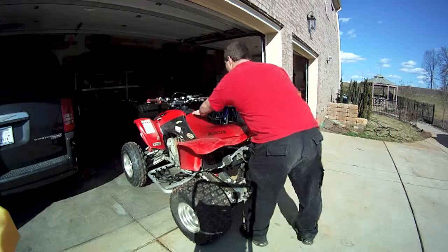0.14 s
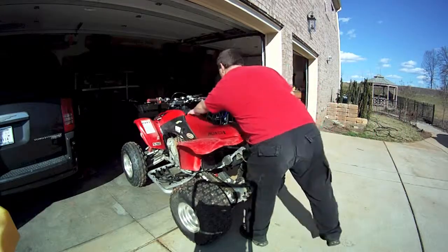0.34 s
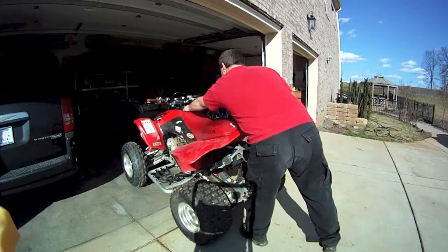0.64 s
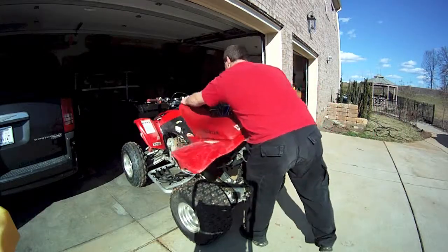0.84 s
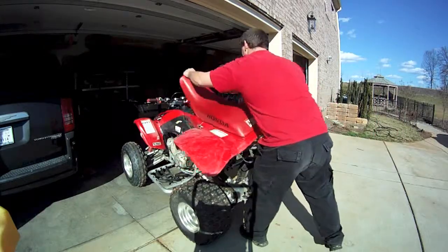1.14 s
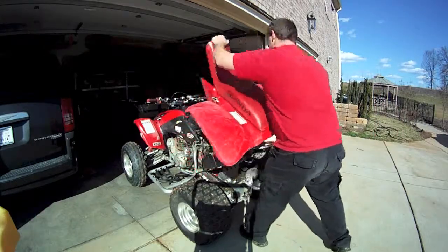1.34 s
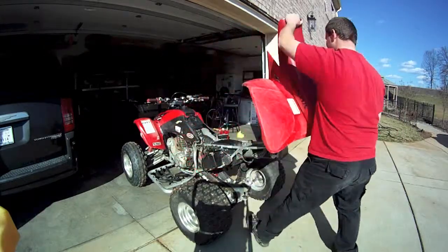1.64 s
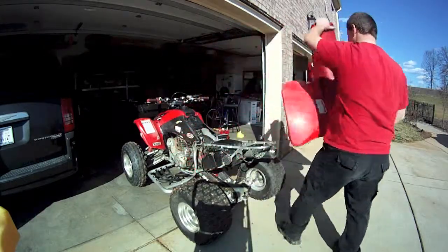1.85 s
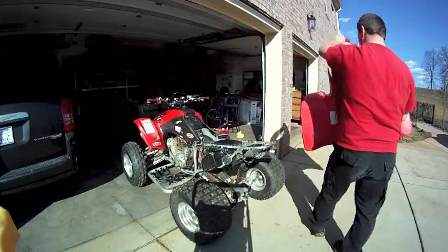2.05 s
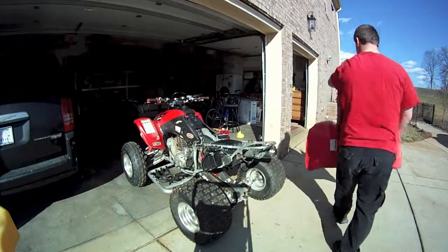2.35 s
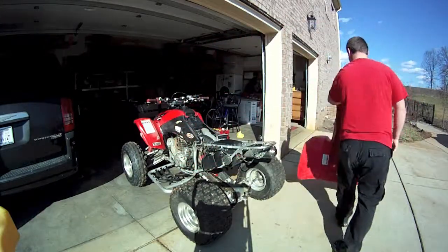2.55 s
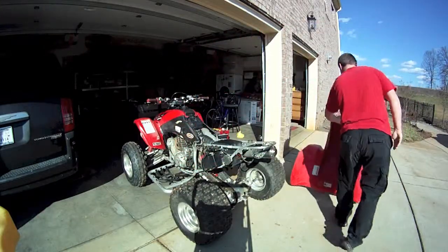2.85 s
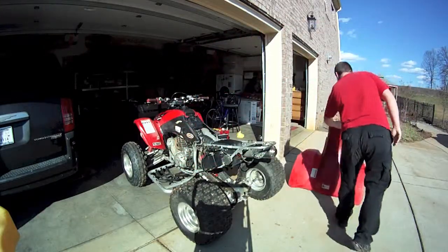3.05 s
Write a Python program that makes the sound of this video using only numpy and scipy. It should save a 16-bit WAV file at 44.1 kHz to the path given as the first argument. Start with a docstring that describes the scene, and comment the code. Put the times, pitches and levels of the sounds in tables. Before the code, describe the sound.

A plastic fender taps lightly at the start, then knocks and scrapes against a quad bike's frame from about 0.5 to 1 second. Faint shoe scuffs and gritty ticks follow from 1.6 to 2.9 seconds. At 3 seconds the fender lands on concrete with a loud, hollow clunk and a small rebound, briefly overloading the microphone. An open garage adds slight echo over steady low rumble, hum and hiss.

```python
"""A plastic fender is tugged off a quad bike, carried a few steps and dropped on a concrete drive.
It knocks and stick-slips on the frame as it comes free; soles scuff grit; the shell lands edge by edge,
its modes ringing in a hollow clunk. An open garage answers, over steady rumble, hum and hiss.
A small camera's coarsely sampled microphone channel overloads on the landing."""
import sys
import numpy as np
from scipy import signal
from scipy.fft import rfft, irfft, next_fast_len
from scipy.io import wavfile
from scipy.ndimage import map_coordinates

SR = 44100
rng = np.random.default_rng(int(sys.argv[2]) if len(sys.argv) > 2 else 0)


def wav_record(signal):
    """Record a signal, one row per channel, as 16-bit PCM in the file named by sys.argv[1]."""
    frames = np.transpose(np.atleast_2d(signal))
    bounded = np.clip(frames, -1, 1)
    # unit amplitude maps onto the largest positive 16-bit level
    quanta = np.round(bounded * 32767).astype(np.int16)
    wavfile.write(sys.argv[1], SR, quanta)


N = 141120
T = np.arange(N) / SR

# fender resonances while held against the frame: centre_hz, width_hz, gain_db
HELD_MODES = [(190.6, 21, 3.5), (298, 47, 1.5), (394, 67, 0.5), (475, 52, -4.5), (742, 17.4, 2),
              (995, 32, -4.5), (1363, 68, -6.5), (1812, 44, -5), (2110, 280, -13), (3250, 370, -9),
              (4200, 120, -17), (4500, 430, -19)]


def amp(db):
    """Decibels to gain."""
    return 10 ** (np.asarray(db) / 20)


def unit(x):
    """Scale to rms 1."""
    return x / np.sqrt(np.mean(x ** 2) + 1e-20)


def along(points, hz):
    """Interpolate (freq_hz, value) points on a log axis."""
    knots_hz, values = np.transpose(points)
    return np.interp(np.log(hz + 1), np.log(knots_hz + 1), values)


def filtered(x, response):
    """Apply response(hz) by FFT."""
    size = next_fast_len(len(x) + 8192)
    return irfft(rfft(x, size) * response(np.fft.rfftfreq(size, 1 / SR)), size)[:len(x)]


def coloured(x, spectrum):
    """Shape x by (freq_hz, gain_db) points; rms 1."""
    return unit(filtered(x, lambda hz: amp(along(spectrum, hz))))


def noise(spectrum):
    """Steady coloured noise; rms 1."""
    return coloured(rng.standard_normal(N), spectrum)


def narrow_noise(centre_hz, width_hz):
    """Noise band around a steady or moving centre; rms 1."""
    phase = 2 * np.pi * np.cumsum(centre_hz + np.zeros(N)) / SR
    i, q = [filtered(rng.standard_normal(N), lambda hz: 1 / (1 + (hz / width_hz) ** 2)) for _ in range(2)]
    return unit(i * np.cos(phase) + q * np.sin(phase))


def band_decay(x, t60_points):
    """Decay each band of x by (freq_hz, t60_s) points."""
    hz, t, bands = signal.stft(x, SR, nperseg=256)
    decay = amp(-60 * t / along(t60_points, hz)[:, None])
    return signal.istft(bands * decay, SR, nperseg=256)[1][:len(x)]


def fade(t60_s):
    """Exponential decay from time zero."""
    return np.exp(-np.log(1000) * T / t60_s)


def at(start_s, x):
    """Delay x to start_s; cut at N."""
    return np.pad(x, (round(start_s * SR), 0))[:N]


def wobble(knots_per_s):
    """Smooth random curve."""
    return map_coordinates(rng.standard_normal(400), [T * knots_per_s], mode="wrap")


def background():
    """Low rumble, fuzzy hum, broad hiss and two narrow hisses wandering in pitch."""
    # rumble spectrum: freq_hz, gain_db
    rumble_spectrum = [(12, -39), (20, -3.5), (107, -2.5), (167, -9.5), (199, -7), (248, -17), (270, -13),
                       (401, -16), (501, -18.5), (605, -13.5), (867, -22.5), (1200, -45), (1560, -61),
                       (2640, -120)]
    # hiss spectrum: freq_hz, gain_db
    hiss_spectrum = [(600, -16), (1100, 4.5), (1900, -1.5), (2400, 3.5), (2950, 4), (3400, -2.5),
                     (4200, -3), (5600, -8.5)]
    # hum bands: centre_hz, level_db
    hum_bands = [(102, -44.5), (199, -47.5), (590, -68.5)]
    # pitch path of the thinnest hiss: time_s, centre_hz
    whistle_path = [(0, 2657), (.45, 2750), (.56, 3250), (.72, 2743), (1.3, 2850), (1.74, 3310),
                    (1.95, 3267), (2.2, 2870), (3.2, 2770)]
    hum = sum(amp(db) * narrow_noise(hz, width_hz=9.3) for hz, db in hum_bands)
    fizz = amp(-55) * narrow_noise(2780 + 90.98 * wobble(knots_per_s=30), width_hz=120)
    whistle = amp(-59.5) * narrow_noise(np.interp(T, *np.transpose(whistle_path)), width_hz=38)
    rumble = amp(-38.5) * noise(rumble_spectrum)
    hiss = amp(-51) * noise(hiss_spectrum)
    return rumble + hum + hiss + fizz + whistle


def rub(force):
    """Contact force rings the held fender's resonances over broad rubbing noise; rms 1."""
    # rubbing noise spectrum: freq_hz, gain_db
    rub_spectrum = [(80, -18), (220, 5.5), (700, 2), (1100, -4.5), (2200, -14), (3300, -15), (4500, -15),
                    (5600, -28)]

    def resonances(hz):
        return sum((-1) ** k * amp(db) * 1j * hz * width_hz / (mode_hz ** 2 - hz ** 2 + 1j * hz * width_hz)
                   for k, (mode_hz, width_hz, db) in enumerate(HELD_MODES))

    return unit(noise(rub_spectrum) + amp(1.5) * unit(filtered(force, resonances)))


def knocks():
    """The held fender bumps the frame, duller where contact is soft, and thumps as it flexes."""
    # bumps on the frame: start_s, gain_db, cutoff_hz
    bumps = [(0.062, -41, 2000), (0.091, -35, 2000), (0.5312, -24, 700), (.5425, -30, 900),
             (0.552, -19.5, 980), (0.5604, -35, 495), (0.632, -50, 2500), (0.649, -30.5, 398),
             (.672, -31, 400), (.793, -29.5, 200)]
    # panel flexes: start_s, level_db
    flexes = [(.56, -29), (.645, -30), (0.706, -44), (0.863, -35), (0.92, -30)]
    ring = sum(amp(db) * np.sin(2 * np.pi * hz * T) * np.exp(-np.pi * width_hz * T)
               for hz, width_hz, db in HELD_MODES) / 2
    thump = np.sin(2 * np.pi * 116.5 * T) * fade(t60_s=0.32)
    out = sum(at(start_s, amp(db) * thump) for start_s, db in flexes)
    for start_s, db, cutoff_hz in bumps:
        burst = amp(4.5) * rub(rng.standard_normal(N)) * fade(t60_s=0.061)
        softness = signal.butter(1, cutoff_hz, fs=SR, output="sos")
        out += at(start_s, amp(db) * signal.sosfilt(softness, ring + burst))
    return out


def ticks(width_oct=0.3):
    """Small hard contacts that leave the shell still."""
    # contacts of clips, soles and grit: start_s, level_db, centre_hz
    contacts = [(.0935, -36.5, 4170), (.478, -29, 610), (0.6308, -28, 3410), (1.657, -38, 4000),
                (1.756, -39, 5370), (2.406, -34, 700), (2.6499, -31, 3070), (3.1645, -26, 5370),
                (3.1666, -30.5, 5396)]
    out = np.zeros(N)
    for start_s, db, centre_hz in contacts:
        white = rng.standard_normal(N)
        band = filtered(white, lambda hz: 1 / (1 + (np.log2((hz + 1) / centre_hz) / width_oct) ** 2))
        out += at(start_s, amp(db) * unit(band) * fade(t60_s=0.02))
    return out


def slips(rate_per_s, spread_db):
    """Friction force: dense tiny slips of random size; rms 1."""
    slipping = rng.random(N) < rate_per_s / SR
    return unit(slipping * rng.standard_normal(N) * amp(spread_db * rng.standard_normal(N)))


def scrape():
    """The pulled fender sticks and slips over the frame."""
    # sliding envelope: time_s, gain_db
    slide = [(0.44, -64), (0.48, -49.5), (0.512, -41.5), (0.522, -37), (0.55, -33.5), (0.624, -40.5),
             (0.632, -32.5), (0.682, -45.5), (0.766, -60.5), (0.804, -43), (0.878, -49.5), (0.922, -38),
             (0.994, -67), (1.0, -67)]
    level_db = np.interp(T, *np.transpose(slide), left=-120, right=-120) + 3.5
    return amp(level_db) * rub(slips(rate_per_s=4400, spread_db=2.5))


def steps():
    """Grit rubs under each sole in a short swell."""
    # scuffs on concrete: peak_s, sigma_s, level_db
    scuffs = [(0.807, 0.019, -44), (1.62, 0.065, -51), (1.775, 0.048, -51), (1.873, 0.026, -51.5),
              (2.454, 0.053, -51.5), (2.637, 0.069, -50), (2.876, 0.021, -40.5)]
    # sole friction spectrum: freq_hz, gain_db
    sole_spectrum = [(200, -2), (700, 9), (1500, 3.5), (3000, 8), (4000, -4), (4800, 6), (5700, -7)]
    swell = sum(amp(db) * np.exp(-0.5 * ((T - peak_s) / sigma_s) ** 2) for peak_s, sigma_s, db in scuffs)
    return swell * coloured(slips(rate_per_s=1700, spread_db=0), sole_spectrum)


def landing(bend_depth=0.0098, attack_s=0.0026, slap_hz=296):
    """Each landing edge cracks, slaps the air and sets the bending shell ringing and fluttering."""
    # edge impacts on concrete: start_s, slap_db, ring_db, crack_db
    impacts = [(3.0207, 5.5, -6, -40), (3.0443, 8, -7.5, -6), (3.0544, 2, -9, -33), (3.0754, -20, -19, -16),
               (3.166, -27, -20.5, -35)]
    # free shell modes: pitch_hz, gain_db, t60_s
    shell_modes = [(95.1, -9, 0.64), (117.9, -0.5, 0.31), (185.8, 0, 0.31), (208.3, 7.5, 0.18),
                   (270, -3.5, 0.11), (320.6, -6.5, 0.43), (401, -3.5, 0.37), (436, -14, .25),
                   (479, -3.5, 0.22), (502.5, -7.5, 0.17), (687, -6, 0.26), (777, 0, 0.15), (882, -21, 0.2),
                   (1380, -24, 0.14)]
    # dense flutter between the modes: freq_hz, gain_db
    flutter_spectrum = [(40, -27), (90, 0), (250, 8), (700, 2.5), (1100, -14.5), (2000, -24.5), (3200, -27),
                        (5500, -36.5)]
    # flutter decay: freq_hz, t60_s
    flutter_decay = [(100, 0.33), (600, 0.32), (1500, 0.61), (2500, 0.9), (5500, 0.71)]
    # hard contact spectrum: freq_hz, gain_db
    crack_spectrum = [(100, -37), (600, 7), (1400, 0), (3000, -22), (5500, -33)]
    out = np.zeros(N)
    for start_s, slap_db, ring_db, crack_db in impacts:
        # bending wavers the pitch of all modes together
        warped_s = T + bend_depth * np.cumsum(wobble(knots_per_s=32.4)) / SR
        modes = sum(amp(db + rng.standard_normal()) * np.sin(2 * np.pi * hz * warped_s) * fade(t60_s)
                    for hz, db, t60_s in shell_modes) / 2
        flutter = amp(-6.5) * band_decay(noise(flutter_spectrum), flutter_decay)
        ring = (modes + flutter) * (1 - np.exp(-T / attack_s))
        # the broad panel pushes air for a cycle or two
        slap = 2 * np.sin(2 * np.pi * slap_hz * T) * fade(t60_s=0.019) * (1 - np.exp(-2 * slap_hz * T))
        crack = noise(crack_spectrum) * fade(t60_s=0.025)
        out -= at(start_s, amp(slap_db) * slap + amp(ring_db) * ring + amp(crack_db) * crack)
    # the microphone's low cut thins the clunk's deepest bass
    return signal.sosfilt(signal.butter(2, 78, "high", fs=SR, output="sos"), out)


def garage(x, delay_s=0.008):
    """Diffuse reflections from the garage and house wall."""
    # reverberation decay: freq_hz, t60_s
    tail_decay = [(100, 0.29), (1000, 0.21), (5000, 0.12)]
    tail = band_decay(rng.standard_normal(SR // 2), tail_decay)
    return at(delay_s, signal.fftconvolve(x, tail / np.linalg.norm(tail)))


def scene():
    """Fender, steps and their echo over the background; mono."""
    direct = landing() + knocks() + ticks() + scrape() + steps()
    return (direct + amp(-14) * garage(direct) + background())[None]


def record(dry):
    """The camera band-limits, clips and holds each coarse sample, mirroring the sound into the treble."""
    band_hz, hold_hz, top_hz = 5750, 12000, 15400
    band = filtered(dry[0], lambda hz: 1 / np.sqrt(1 + (hz / band_hz) ** 60))
    clipped = np.clip(band, -1, 1)
    mirrored = clipped * (1 + 2 * np.cos(2 * np.pi * hold_hz * T))
    return filtered(mirrored, lambda hz: np.sinc(hz / hold_hz) * (hz < top_hz))[None]


dry = scene()
out = record(dry)
wav_record(out)
```